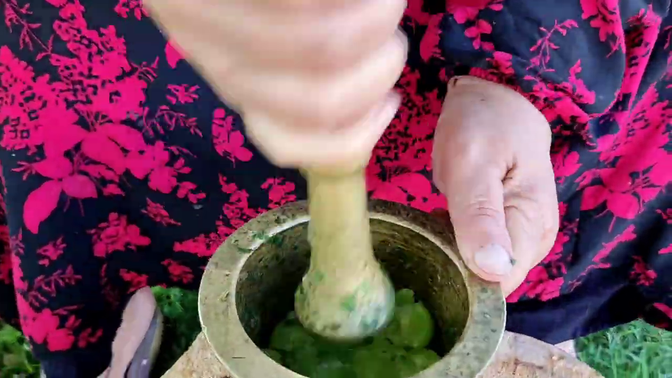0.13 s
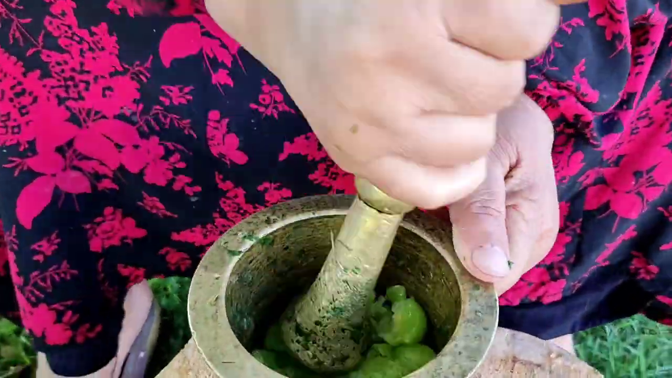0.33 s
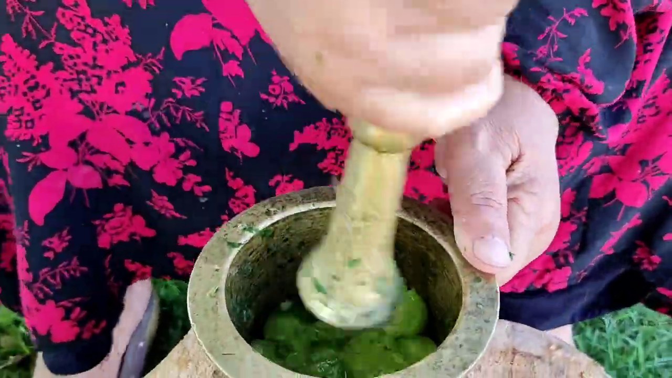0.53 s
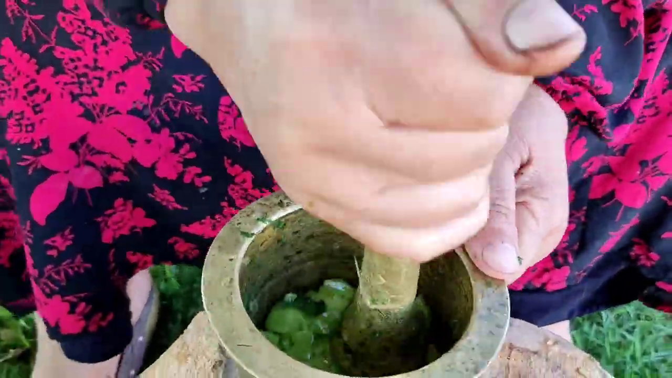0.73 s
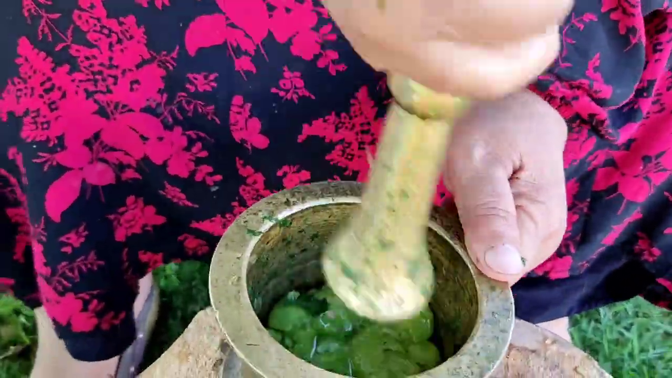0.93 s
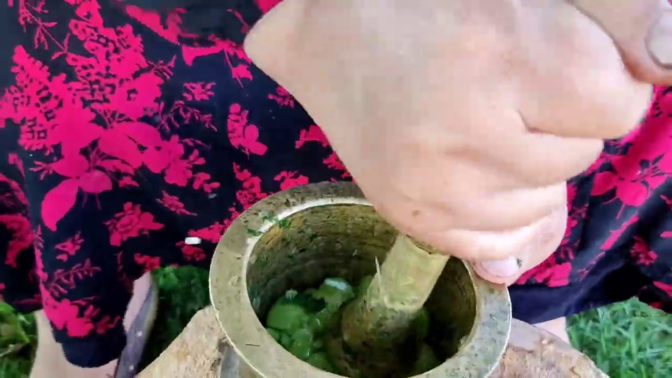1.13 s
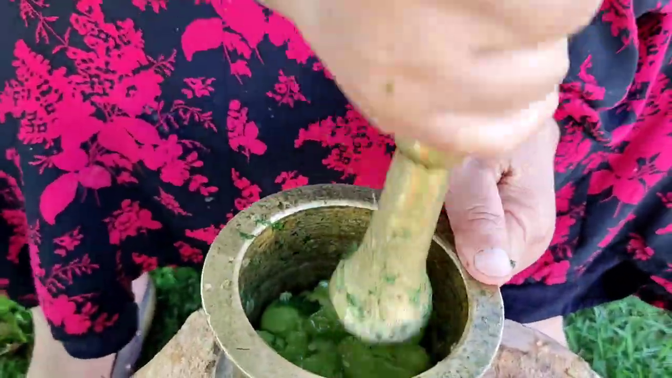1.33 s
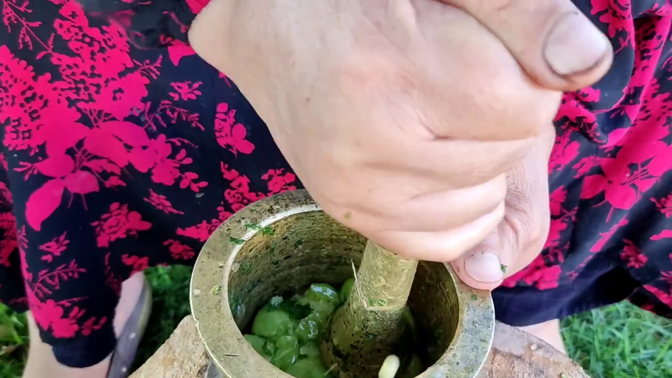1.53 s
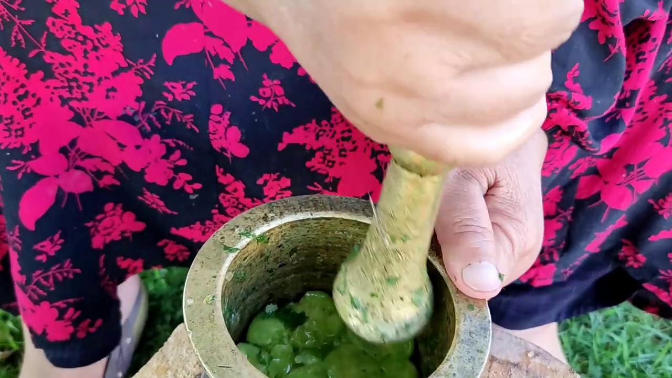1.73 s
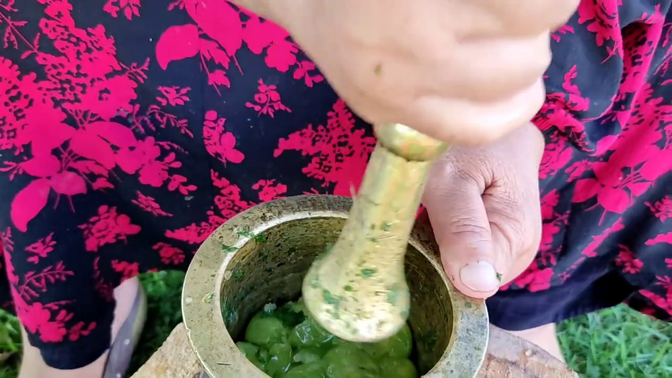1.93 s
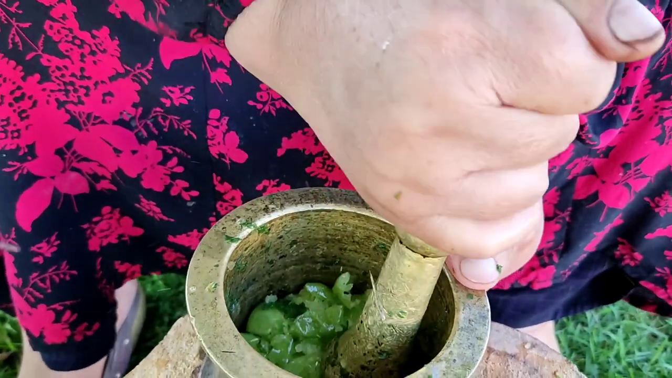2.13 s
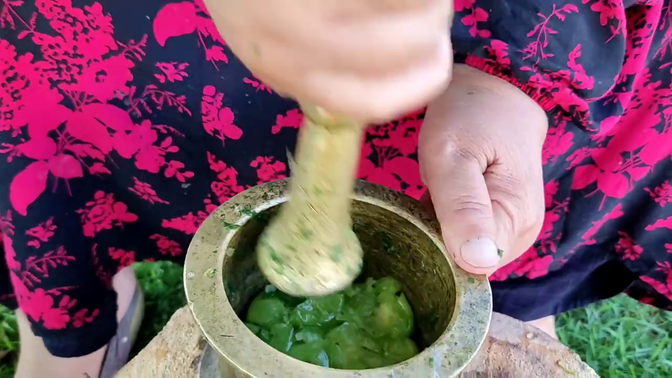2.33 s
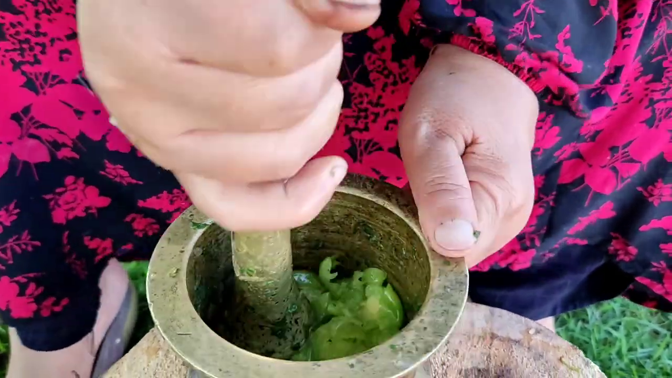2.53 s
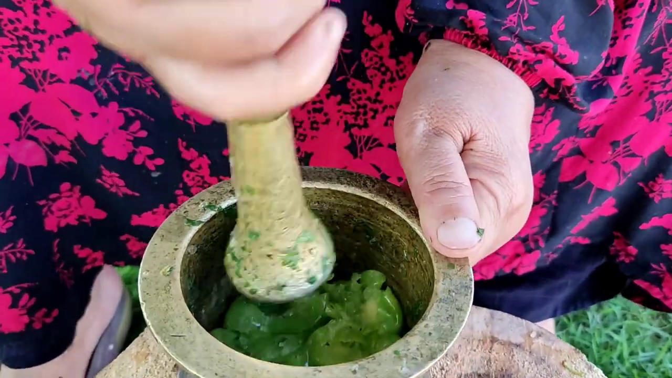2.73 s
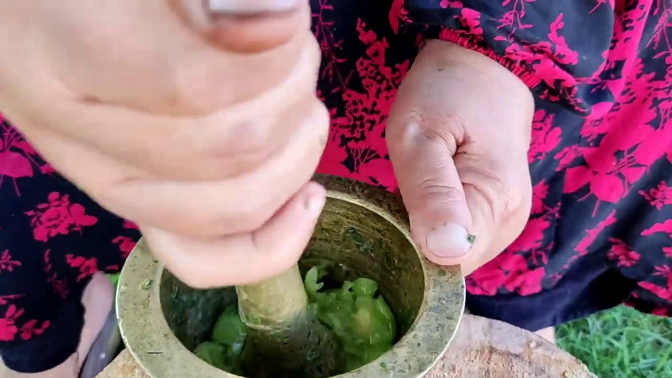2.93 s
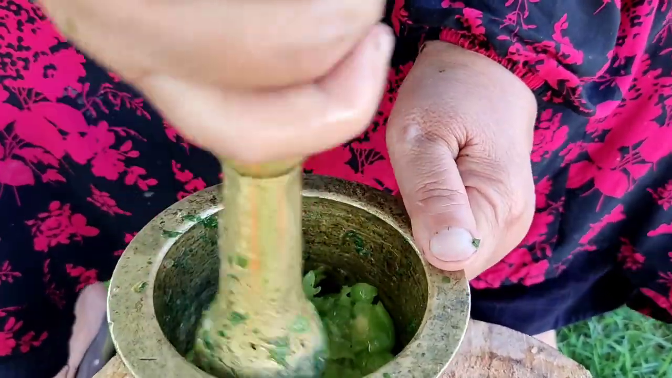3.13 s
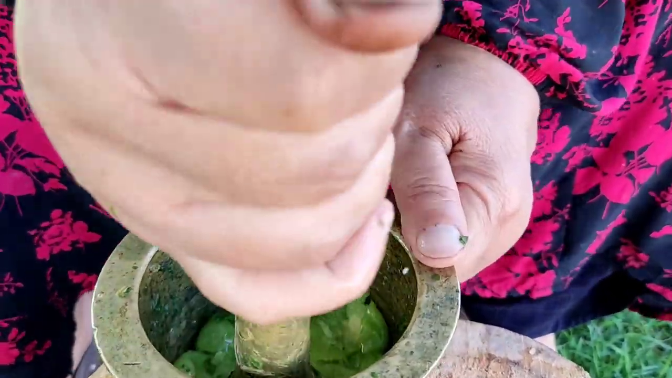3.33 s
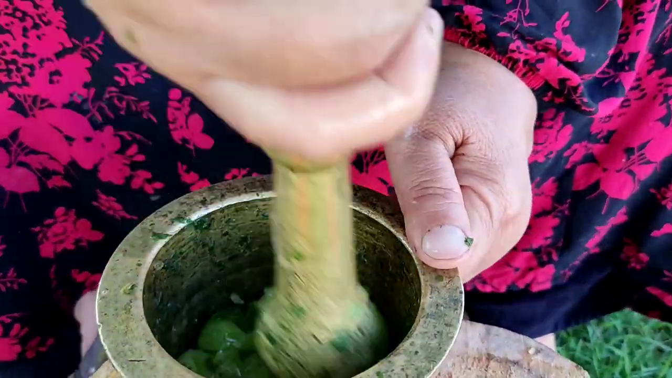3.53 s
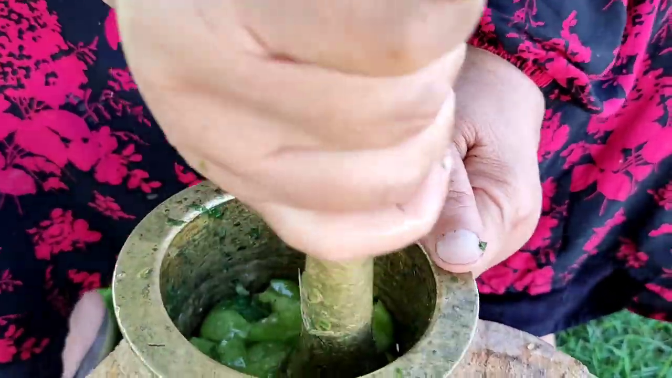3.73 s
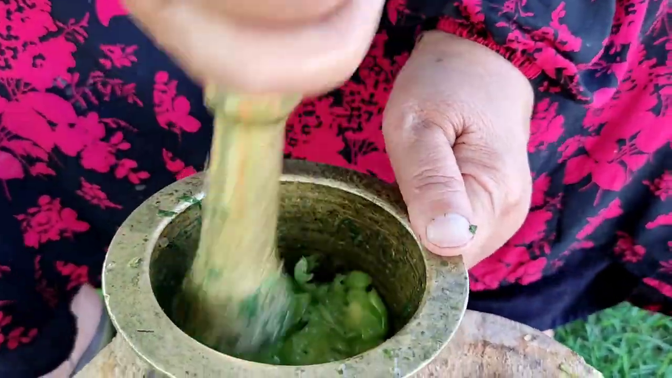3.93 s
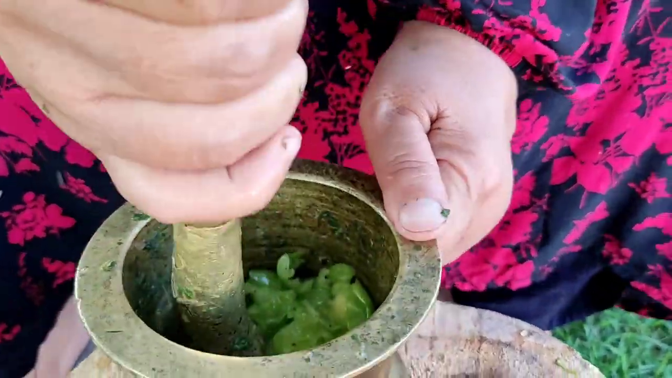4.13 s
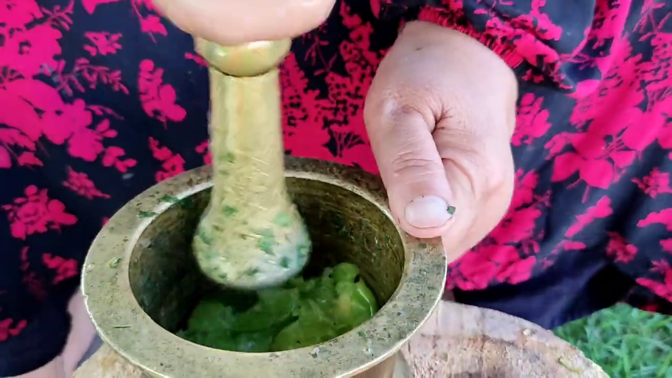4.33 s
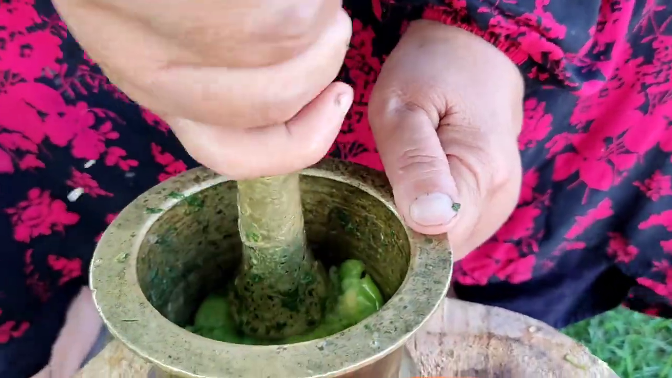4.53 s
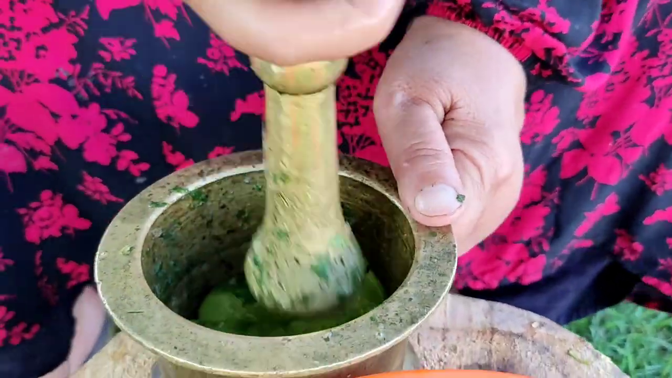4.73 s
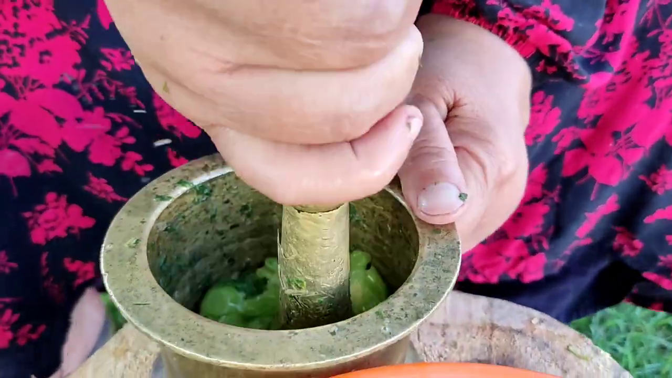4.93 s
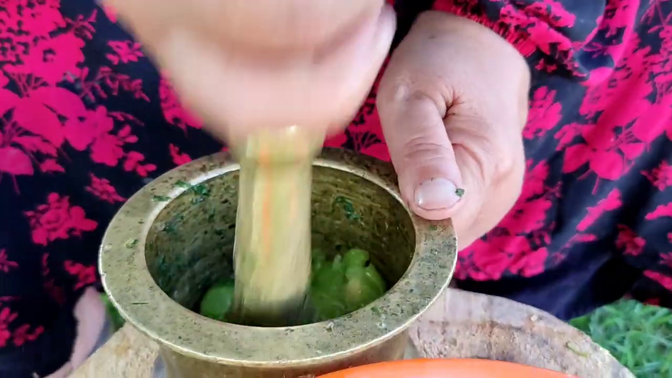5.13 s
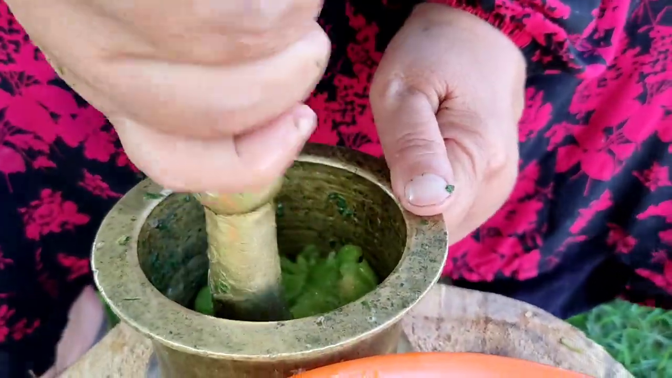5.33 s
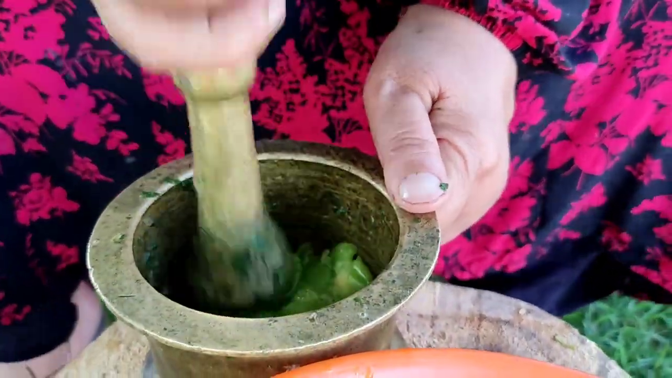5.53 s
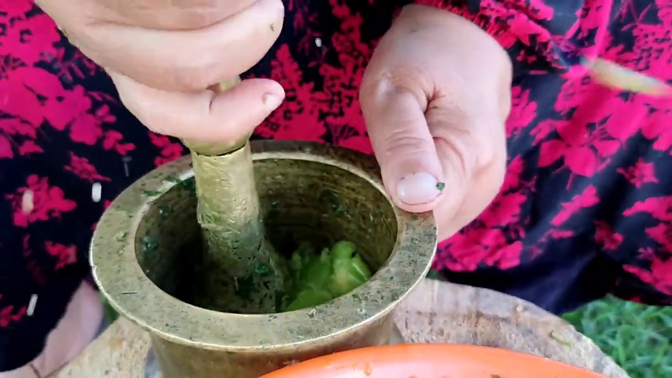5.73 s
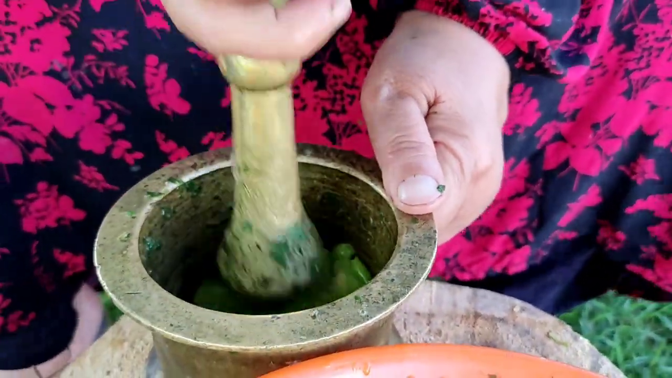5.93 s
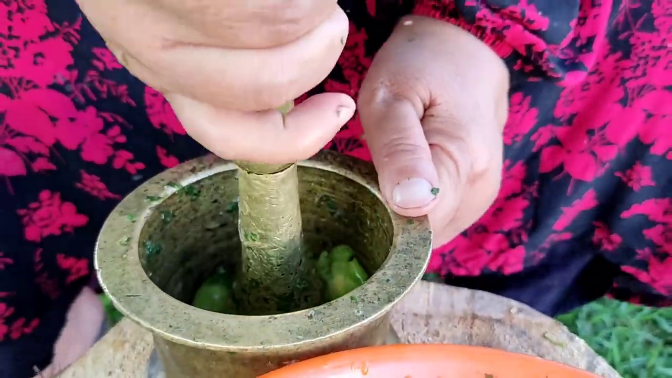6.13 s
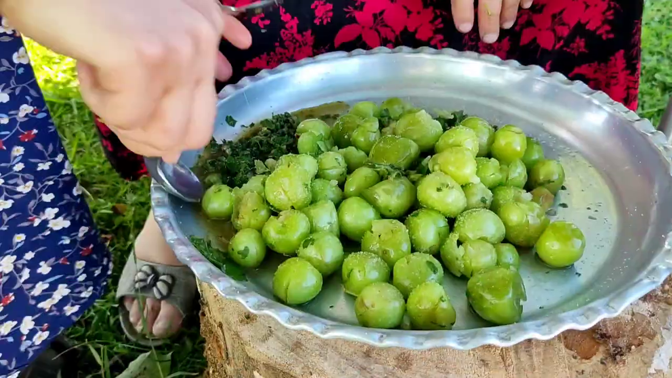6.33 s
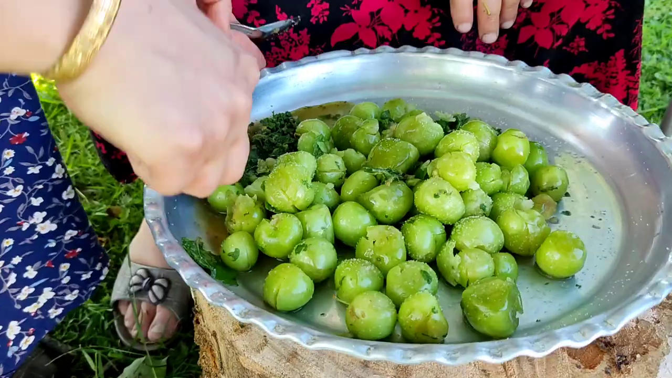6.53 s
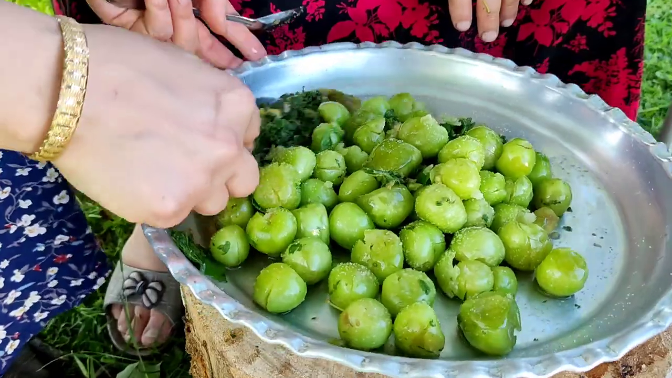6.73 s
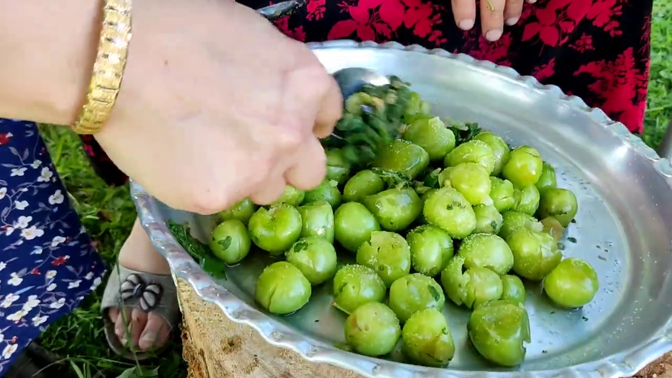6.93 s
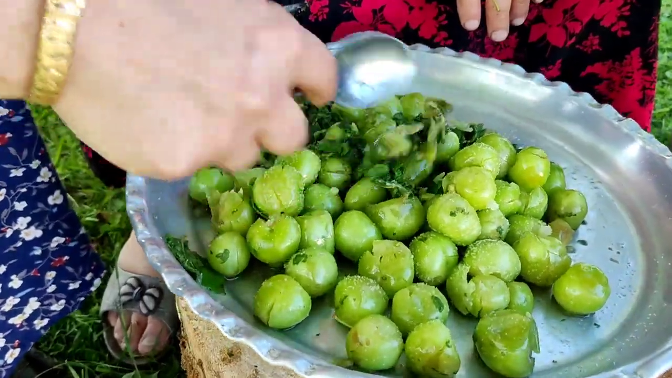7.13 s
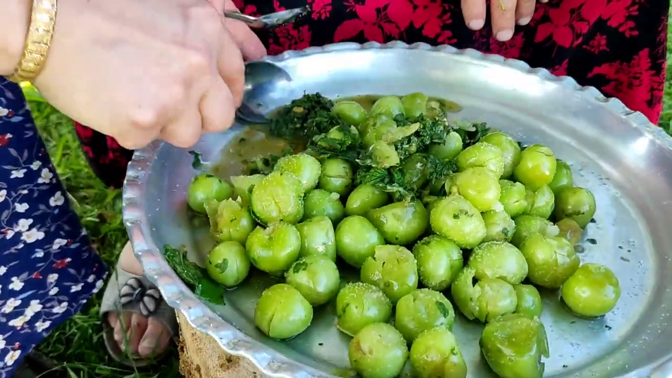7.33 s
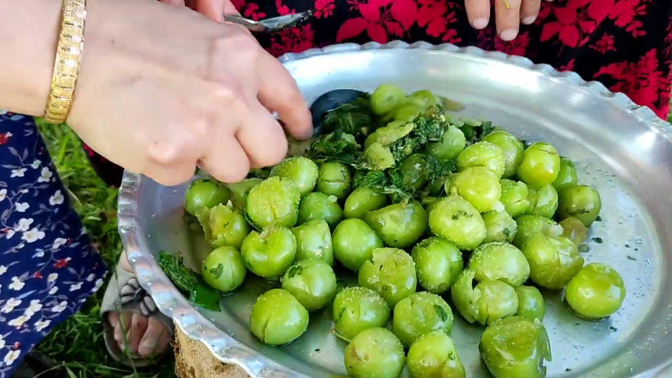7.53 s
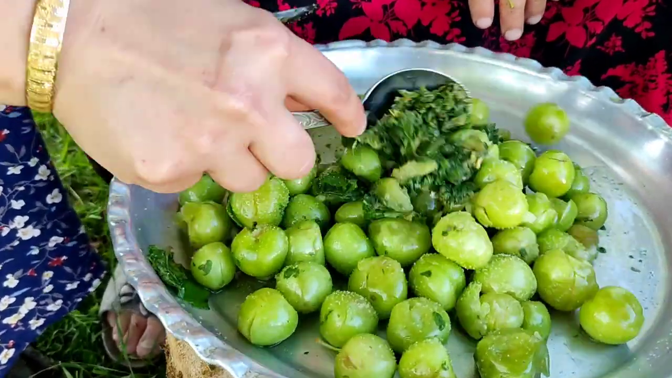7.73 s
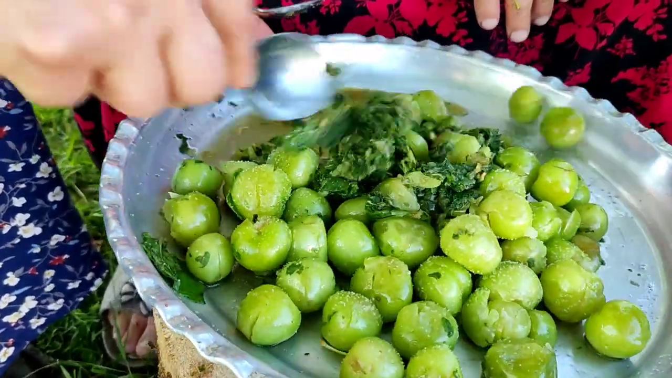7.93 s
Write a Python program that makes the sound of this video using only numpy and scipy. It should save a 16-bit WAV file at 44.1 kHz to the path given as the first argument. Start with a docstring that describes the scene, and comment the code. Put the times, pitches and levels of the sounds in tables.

```python
"""Outdoors in a garden, a brass pestle pounds herbs and green fruit in a brass mortar on a tree stump.
Filtered click grains squirt, fizz and tick as wet pulp; gliding sines gulp, and a low sine thumps the stump.
Some strokes clip the wall first: a tick and decaying sine modes ring briefly; damped sines knock like wood.
Then a spoon, grains ringing a bank of tray modes, knocks and scrapes among the fruit.
Behind lie a far bird and one thin far call (gliding tones), and light wind (shaped noise)."""
import sys
import numpy as np
from scipy import signal
from scipy.io import wavfile
from scipy.ndimage import uniform_filter1d

SR = 44100
rng = np.random.default_rng(int(sys.argv[2]) if len(sys.argv) > 2 else 0)


def master_out(mix):
    """Clip the mix to full scale and print it as 16-bit PCM to the path in sys.argv[1]."""
    frames = np.transpose(np.atleast_2d(mix))
    ceiling = np.clip(frames, -1, 1)
    pcm = np.round(ceiling * 32767).astype(np.int16)
    wavfile.write(sys.argv[1], SR, pcm)


N = 356769
RIGHT_LEAD = 13  # samples by which the right port hears the close sounds first


def gain_of(db):
    """Decibels to gain."""
    return 10 ** (np.asarray(db) / 20)


def evened(x):
    """Scales to rms 1."""
    return x / np.sqrt(np.mean(x ** 2) + 1e-20)


def packet(x):
    """Scales a short sound to the energy of 10 ms at rms 1."""
    return x / np.sqrt(np.mean(x ** 2) * x.shape[-1] / (SR / 100) + 1e-20)


def read(points, hz):
    """Reads a curve of (f/Hz, value) points on a log-frequency axis."""
    f, value = np.transpose(points)
    return np.interp(np.log(hz + 1), np.log(f + 1), value)


def add(mix, s, sound):
    """Mixes a sound in at time s, or at the very start if s is negative."""
    part = mix[:, max(round(s * SR), 0):][:, :sound.shape[-1]]
    part += sound[..., :part.shape[-1]]


def colour(x, db_at):
    """Minimum-phase filter with the gain db_at(Hz), so nothing smears ahead of an attack."""
    hz = abs(np.fft.fftfreq(2048, 1 / SR))
    log_gain = np.log(gain_of(np.maximum(db_at(hz), -100)))
    taps = np.fft.ifft(np.exp(np.conj(signal.hilbert(log_gain)))).real
    return signal.fftconvolve(x, np.atleast_2d(taps), axes=1)[:, :x.shape[1]]


def thirds(x, spectrum):
    """Colours x and splits it into treble, middle and low parts."""
    x = colour(x, lambda hz: read(spectrum, hz))
    parts = []
    for band in [(7000, 16000), (2000, 7000), (200, 2000)]:
        sos = signal.butter(3, band, "bandpass", fs=SR, output="sos")
        parts.append(signal.sosfilt(sos, x))
    return parts


def grains(n, spread_db, apart, clump=8):
    """Tiny clicks of uneven size, shared by both ports plus a share (apart) of each port's own."""
    size = gain_of(spread_db * np.minimum(rng.exponential(1, n // clump + 1), 4))
    size = size.repeat(clump)[:n]
    shared, own = rng.standard_normal(n), rng.standard_normal((2, n))
    left, right = size * (shared + apart * own)
    return np.array([np.roll(left, RIGHT_LEAD), right])


def sides(db):
    """Left and right gains of constant total power, db apart."""
    pair = np.array([gain_of(db / 2), gain_of(-db / 2)]).reshape(2, -1)
    return pair / np.sqrt(np.mean(pair ** 2, axis=0))


# pestle crushing pulp, levels before trim: [t/s, length scale/s, spray level/dB, squelch level/dB,
# slap level/dB, stump thump level/dB, left-right/dB]
PESTLE_CRUSHES = [(0.012, 0.0037, -59, -62, -49.5, -70, -2), (0.148, 0.0016, -41, -51.5, -65, -68, -3),
                  (0.3626, 0.0037, -12.5, -22.5, -31.5, -41, 5), (0.511, 0.016, -40.5, -43, -50, -49, -1),
                  (0.643, 0.00081, -36.5, -73, -71, -70, 3), (.6908, 0.0049, -18, -27.5, -41, -59, -5),
                  (0.696, 0.0069, -12.5, -21, -33, -28, -2), (0.715, 0.017, -25.5, -28, -47, -52, 4),
                  (1.0927, 0.004, -14, -23.5, -41.5, -36, 0.5),
                  (1.4786, 0.0052, -14.5, -31, -40.5, -36.5, 2.5),
                  (2.129, 0.0038, -12.5, -27, -34.5, -27.5, 5.5), (2.34, 0.0079, -48, -47.5, -48.5, -70, 2),
                  (2.529, 0.013, -12, -20, -20.5, -45, 5.5), (2.669, 0.016, -37, -50, -54.5, -70, 1),
                  (2.9376, 0.0066, -13, -26.5, -35, -30.5, 4.5), (3.307, 0.0096, -13.5, -25, -37.5, -33, 5),
                  (3.682, 0.0088, -13.5, -21, -44, -32.5, 4), (4.0718, 0.0097, -11.5, -17.5, -23, -56, 5),
                  (4.482, 0.01, -15, -24, -40, -38, 10), (4.661, 0.0062, -41, -65, -63, -70, -11),
                  (4.8942, 0.008, -14, -24, -39, -28, -1.5), (5.2492, 0.0045, -11, -35, -36.5, -35, 23),
                  (5.649, 0.008, -14, -17, -28, -34, 3), (6.0714, 0.0058, -18, -28.5, -35.5, -32, -1)]
# relative colour of the wet pulp heard from the bowl: [f/Hz, level/dB per Hz]
PULP_COLOUR = [(150, -38), (400, -28.5), (850, -12), (1060, -17.5), (1350, -8.5), (1700, -20.5),
               (2250, -9.5), (2900, -24.5), (3700, -10.5), (4500, -15.5), (5300, -10), (6900, -17),
               (9100, 1.5), (11000, -9), (14300, -20.5)]


def crushes(rise=0.5, fall=0.7, lead=0.97, spread_db=0.0, trims_db=(0, -.5, -1), bowl_shift=0.08,
            seep_db=-13, spatter_db=-32, spatter_decay_s=0.042):
    """Juice and air spray out ever faster as the gap closes, then die off as the pestle lands."""
    out, t = np.zeros((2, N)), np.arange(-SR // 40, SR // 16) / SR
    for s, length, *levels, _, pan_db in PESTLE_CRUSHES:
        squeeze = np.exp(-abs(t) / (length * np.where(t < 0, rise, fall)))
        # little escapes before the pulp is touched
        squeeze *= np.where(t > -lead * length, 1, gain_of(seep_db))
        # droplets land on the wall
        squeeze += (t > 0) * gain_of(spatter_db) * np.exp(-t / spatter_decay_s)
        # the bowl's air resonances depend on where the pestle stands, drawn at random
        shift = 1 + bowl_shift * (2 * rng.random() - 1)
        bowl = [(hz * shift if hz < 5000 else hz, db) for hz, db in PULP_COLOUR]
        parts = thirds(grains(len(t), spread_db, apart=1.0) * squeeze, bowl)
        crush = sum(gain_of(db + trim) * packet(p) for db, trim, p in zip(levels, trims_db, parts))
        add(out, s + t[0], sides(pan_db) * crush)
    return out


# pestle clipping the wall, levels before trim: [t/s, first mode level/dB, second mode level/dB,
# middle modes level/dB, top modes level/dB, contact tick level/dB, ring time factor,
# delay of the first mode at the left port/samples]
WALL_CLANKS = [(2.48, -24.5, -21.5, -25, -19.5, -29, 0.97, 8),
               (2.504, -28.5, -43, -27.5, -32, -35.5, 0.8, 5.8),
               (3.2318, -19, -22, -21, -15.5, -24, 0.86, 10), (3.2757, -66, -52, -38, -38, -38, 1.2, 5),
               (3.6623, -22.5, -24.5, -15, -17, -28.5, 0.86, 6.6),
               (4.052, -21, -28.5, -25, -19.5, -31.5, 0.77, 10.9),
               (4.466, -17, -31, -17.5, -15.5, -29.5, 0.58, 11.3),
               (5.1686, -15.5, -30.5, -14.5, -18.5, -23, 0.88, 10.1),
               (5.1958, -23.5, -26, -21, -26, -37, 0.67, 9), (5.231, -39.5, -51, -44, -49, -36, 0.86, 11),
               (5.248, -27.5, -45, -39.5, -22.5, -32, 1.02, 11.5),
               (5.5129, -16.5, -31, -20.5, -27, -33, 0.85, 11), (5.854, -48.5, -56, -49, -51, -47, 2, 10.8),
               (5.91, -52.5, -71, -51, -50, -54, 0.53, 13.5)]
# ringing modes of the mortar: [f/Hz, relative level/dB, t60/s before damping, left-right/dB]
MORTAR_MODES = [(1535, 3, 0.22, 5.5), (1532, -15, 0.21, 5), (3671, -2, 0.15, -3.5), (3690, -9.5, 0.13, -15),
                (4050, -11.5, 0.064, 4), (4900, -21, 0.11, 3.5), (5450, -3.5, 0.08, 8.5),
                (6200, -7, 0.19, 18.5), (6370, 1.5, 0.054, -5), (7403, 8, 0.068, -3),
                (8300, -24, 0.045, -15.5), (8600, 2.5, 0.044, -11), (9060, 4, 0.077, -46.5),
                (9850, 7, 0.044, -33.5), (11300, -8.5, 0.049, -13), (11200, -3.5, 0.08, 4.5)]
# relative colour of the brass-on-brass tick: [f/Hz, level/dB per Hz]
TICK_COLOUR = [(150, -7.5), (500, -2), (1200, 2), (2400, 1), (3000, -6.5), (5000, -2), (7000, -3.5),
               (9300, 1.5), (11500, -10.5), (14000, -17.5)]


def clanks(ring_db=2, tick_db=7, contact_s=0.00079, tick_decay_s=0.0031, pressed=0.82, tighten=1.114,
           free_db=-28, free_t60_s=0.18, place_db=4.0):
    """Brass meets brass: a tick, then modes that the pestle damps ever harder, over a faint longer ring."""
    out, t = np.zeros((2, N)), np.arange(SR // 4) / SR
    family = np.digitize([mode[0] for mode in MORTAR_MODES], [2500, 4000, 8000])
    attack = 1 - np.exp(-t / contact_s)
    for s, *levels, contact_db, hold, lag in WALL_CLANKS:
        modes = []
        for (hz, db, t60, pan_db), group in zip(MORTAR_MODES, family):
            # the lobes of the first mode turn with the struck spot
            left_lag = RIGHT_LEAD if group else lag
            at_port = t - np.array([[left_lag], [0]]) / SR
            damped = gain_of(-60 * (t / (t60 * hold * pressed)) ** tighten)
            decay = damped + gain_of(free_db - 60 * t / free_t60_s)
            # each spot on the wall favours other modes
            weight = gain_of(db + place_db * rng.standard_normal())
            modes.append(weight * decay * sides(pan_db) * np.sin(2 * np.pi * hz * at_port))
        for k, db in enumerate(levels):
            tone = np.array(modes)[family == k].sum(0)
            start_rms = np.sqrt(np.mean(tone[:, :SR // 200] ** 2))  # over the first 5 ms
            add(out, s, gain_of(db + ring_db) * tone / start_rms * attack)
        clicks = grains(len(t), spread_db=4.5, apart=0.96) * attack * np.exp(-t / tick_decay_s)
        tick = colour(clicks, lambda hz: read(TICK_COLOUR, hz))
        add(out, s, gain_of(contact_db + tick_db) * packet(tick))
    return out


def thumps(hz=44, decay_s=0.018, push_db=2, push_width_s=0.0023, early_s=0.0014):
    """Each crush gives a short push, then the stump sways on the soil for a cycle or two."""
    out, t = np.zeros((2, N)), np.arange(SR // 5) / SR
    sway = np.sin(2 * np.pi * hz * t) * np.exp(-t / decay_s)
    u = t / push_width_s
    push = gain_of(push_db) * u * (1 - u / 2) * np.exp(-u)
    for s, *_, thump_db, _ in PESTLE_CRUSHES:
        add(out, s - early_s, gain_of(thump_db) * (sway + push))
    return out


# air trapped under the pestle: [t/s of the peak, peak level/dB, start f/Hz, end f/Hz]
AIR_GULPS = [(.364, -29, 2280, 2220), (2.132, -39, 2570, 2210), (4.899, -23, 2930, 2020),
             (6.073, -29.5, 2220, 2130)]


def gulps(swell_s=0.0029, glide_s=0.00434):
    """A pocket of air rings for a few milliseconds, sinking in pitch as it opens."""
    out, t = np.zeros((2, N)), np.arange(SR // 20) / SR
    for s, db, start_hz, end_hz in AIR_GULPS:
        pitch = end_hz + (start_hz - end_hz) * np.exp(-t / glide_s)
        turns = np.cumsum(pitch) / SR
        envelope = t / swell_s * np.exp(1 - t / swell_s)
        add(out, s - swell_s, gain_of(db) * envelope * np.sin(2 * np.pi * turns))
    return out


# pulp stirred as the pestle twists and lifts, later as the spoon parts it:
# [t/s of the peak, length scale/s, level/dB before trim]
PULP_STIRS = [(.03, 0.11, -51), (.45, 0.087, -47.5), (.86, 0.049, -48), (1.2, 0.026, -50),
              (1.28, 0.062, -50), (1.66, 0.032, -46), (2.28, 0.059, -45.5), (2.72, 0.26, -52.5),
              (3.1, 0.1, -48.5), (3.57, 0.095, -43.5), (3.85, 0.19, -46.5), (4.22, 0.047, -45),
              (4.7, 0.13, -53.5), (5.04, 0.027, -45), (5.44, 0.025, -50), (5.58, 0.059, -45.5),
              (5.87, 0.058, -48.5), (6.3, 0.087, -62), (6.52, 0.12, -48), (7.68, 0.22, -55.5),
              (7.97, 0.093, -62)]
# relative colour of the fizzing pulp: [f/Hz, level/dB per Hz]
FIZZ_COLOUR = [(200, -12.5), (700, -11), (1400, -11), (2500, -10), (3700, -9), (6400, -8), (9300, 4),
               (11500, -4), (14300, -15)]


def wet_ticks(per_s=60, ticks_db=-4, fizz_db=-2, spread_db=4, rise=1.0, fall=1.7, clump_db=2.0):
    """Each stir swells and dies: a fine fizz in uneven clumps, with single bubbles and fibres letting go."""
    t = np.arange(N) / SR
    power = np.zeros(N)
    for s, length, db in PULP_STIRS:
        swell = gain_of(db) * np.exp(-abs(t - s) / (length * np.where(t < s, rise, fall)))
        power += swell ** 2
    size = gain_of(spread_db * np.minimum(rng.exponential(1, N), 3)) * (rng.random(N) < per_s / SR)
    bursts = signal.lfilter([1], [1, -np.exp(-1 / (0.0018 * SR))], size)  # each dies over 1.8 ms
    ticks = colour(bursts * grains(N, spread_db=4, apart=0.88), lambda hz: read(PULP_COLOUR, hz))
    clumps = gain_of(clump_db * evened(uniform_filter1d(rng.standard_normal(N), size=1100)))
    fizz = colour(clumps * grains(N, spread_db=2.0, apart=3.2), lambda hz: read(FIZZ_COLOUR, hz))
    return np.sqrt(power) * (gain_of(ticks_db) * evened(ticks) + gain_of(fizz_db) * evened(fizz))


# hollow knocks of the mortar rocking on the stump, later of fruit rolling on the tray:
# [t/s, level/dB before trim, main f/Hz]
HOLLOW_KNOCKS = [(0.108, -33, 281), (0.323, -41, 210), (.391, -41, 283), (.717, -35.5, 197),
                 (.744, -41.5, 403), (2.503, -35, 610), (2.529, -50, 330), (2.5434, -23.5, 295),
                 (2.56, -31.5, 330), (2.97, -34.5, 265), (3.045, -38.5, 313), (3.273, -38, 437),
                 (4.067, -32, 332), (4.0801, -20.5, 348), (4.0805, -21, 705), (4.111, -34.5, 249),
                 (5.194, -29, 578), (7.819, -38.5, 285), (7.88, -43, 280), (7.988, -41.5, 260),
                 (8.043, -44, 297)]


def knocks(level_db=-1, t60_s=0.034, pan_db=4):
    """A few heavily damped wooden modes."""
    out, t = np.zeros((2, N)), np.arange(SR // 6) / SR
    modes = [(.62, -15), (1, 2.5), (1.35, -3), (2.2, -12.5), (3.3, -29)]  # (ratio to main f, dB)
    for s, db, hz in HOLLOW_KNOCKS:
        wood = sum(gain_of(mode_db - 60 * t / t60_s) * np.sin(2 * np.pi * hz * ratio * t)
                   for ratio, mode_db in modes)
        add(out, s, gain_of(db + level_db) * sides(pan_db) * wood)
    return out


def ring(hz, t60, t):
    """One dying mode, reaching each port in its own phase."""
    return gain_of(-60 * t / t60) * np.sin(2 * np.pi * (hz * t + rng.random((2, 1))))


# modes of spoon and tray: [nominal f/Hz, relative level/dB, t60/s]
TRAY_MODES = [(880, -2, .05), (1073, -3.5, 0.077), (1454, 13.5, 0.017), (1906, 6.5, 0.049),
              (2500, 1.5, 0.056), (3340, 4, 0.091), (4210, 4, 0.056), (5300, -15, 0.041),
              (6090, 5.5, 0.047), (6750, 2, 0.12), (7820, 11, 0.024), (9000, 7.5, 0.036),
              (10000, -2, 0.038), (9900, -16, .05), (10860, -16, 0.047), (11220, 8.5, 0.093)]


def tray(x, ring_db, load=0.026):
    """Contact clicks pass straight out and also ring the tray, whose modes shift with the spoon's place."""
    t = np.arange(SR // 6) / SR
    body = sum(gain_of(db) * ring(hz * (1 + load * rng.uniform(-1.22, 1)), t60, t)
               for hz, db, t60 in TRAY_MODES)
    ringing = signal.fftconvolve(x, body / np.linalg.norm(body[0]), axes=1)[:, :x.shape[1]]
    return x + gain_of(ring_db) * ringing


def rebound(x, decay_s, count):
    """Slips bounce across the plate for a few milliseconds, in a pattern that changes as the spoon moves."""
    t, place = np.arange(SR // 100) / SR, np.linspace(0, count - 1, x.shape[1])
    out = np.zeros_like(x)
    for k in range(count):
        bounces = evened(rng.standard_normal((1, len(t))) * np.exp(-t / decay_s))
        nearby = x * np.sqrt(np.maximum(1 - abs(place - k), 0))  # crossfade from pattern to pattern
        out += signal.fftconvolve(nearby, bounces, axes=1)[:, :x.shape[1]]
    return out


# spoon landing on the tray: [t/s, length scale/s, treble level/dB, middle level/dB, low level/dB,
# left-right/dB]
TRAY_TAPS = [(6.404, 0.0063, -9, -16.5, -42.5, 1.8), (6.4132, 0.0052, -16, -21, -44, 8.5),
             (6.7283, 0.0052, -35.5, -41.5, -51, -4), (7.3871, 0.005, -14.5, -24, -32, -2),
             (7.406, 0.0048, -23, -32, -34, 7), (7.475, .004, -30, -30, -33.5, 7),
             (7.5437, 0.0046, -36, -41, -53, -2), (7.561, 0.0051, -38, -34.5, -39.5, -3),
             (7.801, 0.015, -39.5, -41.5, -50, -4), (7.856, 0.0037, -35, -45.5, -57, 2)]
# spoon dragged through the fruit, one list per drag:
# [t/s, treble level/dB, middle level/dB, low level/dB]
FRUIT_SCRAPES = [
    [(6.56, -35, -52, -72), (6.58, -33.5, -36, -39.5), (6.628, -35, -41, -50), (6.676, -43, -49.5, -51),
     (6.734, -46, -43.5, -46.5), (6.76, -71, -73, -71)],
    [(7.405, -38, -33.5, -34), (7.466, -36.5, -41, -37), (7.492, -23.5, -23.5, -35),
     (7.511, -30.5, -27.5, -43), (7.535, -37, -53, -62)],
]
# relative colour of spoon on metal: [f/Hz, level/dB per Hz]
METAL_COLOUR = [(200, -26), (450, -5.5), (950, 0), (2100, -8.5), (3400, -7), (4600, -3), (5400, -3),
                (6500, -11), (9000, 6.5), (11200, -5), (12500, -3.5), (14300, -24)]


def spoon(rise=0.14, fall=0.63, catch_db=2.5):
    """The spoon lands with a short chatter, then slips and catches along the metal."""
    out, t = np.zeros((2, N)), np.arange(-SR // 100, SR // 8) / SR
    for s, length, *levels, pan_db in TRAY_TAPS:
        chatter = np.exp(-abs(t) / (length * np.where(t < 0, rise, fall)))
        clicks = grains(len(t), spread_db=-1.0, apart=0.63) * chatter
        parts = thirds(tray(clicks, ring_db=-5), METAL_COLOUR)
        tap = sum(gain_of(db) * packet(p) for db, p in zip(levels, parts))
        add(out, s + t[0] - length / 4, sides(pan_db) * tap)
    for rows in FRUIT_SCRAPES:
        s, *levels = np.transpose(rows)
        t = np.arange(s[0], s[-1], 1 / SR)
        catches = gain_of(catch_db * evened(uniform_filter1d(rng.standard_normal(len(t)), size=160)))
        slips = rebound(grains(len(t), spread_db=1.5, apart=0.62) * catches, decay_s=0.0019, count=4)
        parts = thirds(tray(slips, ring_db=-9.5), METAL_COLOUR)
        drag = sum(gain_of(np.interp(t, s, db)) * evened(p) for db, p in zip(levels, parts))
        add(out, s[0], drag * signal.windows.tukey(len(t), .08))
    return out


# decay of the scattered tail: [f/Hz, t60/s]
TAIL_DECAY = [(200, .12), (1500, 0.16), (4000, 0.13), (10000, 0.11), (14000, 0.055)]


def surroundings(x, tail_db=-19, echo_db=-17, echo_s=0.006, echo_width_s=0.00098):
    """A near echo from the lap and the stump, and a short scattered tail."""
    t = np.arange(SR // 3) / SR
    hz, at, z = signal.stft(rng.standard_normal((2, len(t))) * (t > echo_s), SR, nperseg=256)
    tail_colour = [(300, -5.0), (1500, 1), (4000, 5), (9000, -8.0), (14000, -8.5)]  # (Hz, dB)
    fade_db = -60 * at / read(TAIL_DECAY, hz)[:, None]
    shaped = z * gain_of(fade_db + read(tail_colour, hz)[:, None])
    tail = signal.istft(shaped, SR, nperseg=256)[1][:, :len(t)]
    near = rng.standard_normal((2, len(t))) * np.exp(-((t - echo_s) / echo_width_s) ** 2)
    response = gain_of(tail_db) * tail / np.linalg.norm(tail[0])
    response += gain_of(echo_db) * near / np.linalg.norm(near[0])
    return signal.fftconvolve(x, response, axes=1)[:, :N]


# far bird, falling slurs: [t/s, length/s, start f/Hz, end f/Hz (both before trill), level/dB before trim]
BIRD_SLURS = [(0.601, 0.12, 5300, 3850, -44.5), (1.581, 0.15, 5060, 4270, -54.5),
              (2.39, 0.1, 5200, 4770, -52), (2.816, 0.22, 5430, 3150, -46),
              (4.158, 0.16, 4260, 3270, -44.5), (5.06, 0.07, 5020, 4500, -54),
              (6.817, .11, 4100, 3320, -58.5), (7.086, .13, 4090, 2720, -46),
              (7.058, 0.15, 5500, 4240, -54.5), (7.26, 0.16, 5300, 4080, -53.5),
              (7.806, 0.16, 4800, 4010, -56)]


def bird(level_db=-2, trill=0.059, trill_hz=27, blur_hz=280):
    """Falling runs of quick upward flicks, blurred by distance and foliage."""
    out = np.zeros((2, N))
    low_pass = signal.butter(2, blur_hz, fs=SR, output="sos")
    for s, length, start_hz, end_hz, db in BIRD_SLURS:
        t = np.arange(int(length * SR)) / SR
        flicks = signal.sawtooth(2 * np.pi * (trill_hz * t + rng.random()))
        pitch = np.geomspace(start_hz, end_hz, len(t)) * (1 + trill * flicks)
        scatter = rng.standard_normal((2, len(t))) + 1j * rng.standard_normal((2, len(t)))
        blur = signal.sosfilt(low_pass, scatter)
        slur = (blur * np.exp(2j * np.pi * np.cumsum(pitch) / SR)).real
        add(out, s, gain_of(db + level_db) * evened(slur) * signal.windows.tukey(len(t), .6))
    return out


# faint far call, a single row: [t/s, length/s, start f/Hz, end f/Hz, starting level/dB]
DISTANT_CALL = (1.635, 0.47, 788, 724.5, -65.5)


def far_call(settle_s=0.047, fade_db=-12):
    """One thin note from far off that sinks to its pitch and fades."""
    out, (s, length, start_hz, end_hz, db) = np.zeros((2, N)), DISTANT_CALL
    t = np.arange(int(length * SR)) / SR
    pitch = end_hz + (start_hz - end_hz) * np.exp(-t / settle_s)
    note = np.sqrt(2) * np.sin(2 * np.pi * np.cumsum(pitch) / SR)
    add(out, s, gain_of(db + fade_db * t / length) * note * signal.windows.tukey(len(t), .2))
    return out


# relative colour of the background within each band: [f/Hz, level/dB per Hz]
AIR_COLOUR = [(20, 3.5), (60, -16), (90, -6), (125, -8), (200, -19.5), (320, -19.5), (500, -26),
              (1000, -28.5), (2500, -27.5), (3700, -26), (6400, -34), (9300, -26.5), (11500, -26),
              (14500, -39)]
# likeness of left and right in the background: [f/Hz, correlation]
LEFT_RIGHT_LIKENESS = [(30, 0), (130, 0.95), (300, 0.79), (630, 0.52), (1400, 0.1), (14000, 0)]
# slow drift of the garden wash: [t/s, level/dB before trim]
WASH_LEVEL = [(0.0, -67.5), (0.99, -62.5), (1.37, -68), (3.0, -61.5), (7.26, -66.5), (7.61, -61.5),
              (8.09, -65)]
RUMBLE_DB, HISS_DB = -51.5, -59.5  # steady wind below the wash, faint hiss above it


def air(patchy_db=2.33, flicker_db=1, wash_db=4.0):
    """Wind rumble, garden wash and fine hiss as shaped noise; only the wash drifts slowly in level."""
    frames, hz = N // 256 + 5, np.fft.rfftfreq(1024, 1 / SR)
    a, b, c, d, patches = rng.standard_normal((5, frames, len(hz)))
    # patches vary over time and frequency; the flicker moves all frequencies together
    patches = uniform_filter1d(patches, size=8, axis=0)
    patches = evened(uniform_filter1d(patches, size=14, axis=1))
    flicker = evened(uniform_filter1d(rng.standard_normal(frames), size=4))[:, None]
    same, left = np.clip(read(LEFT_RIGHT_LIKENESS, hz), -1, 1), a + 1j * b
    right = same * left + np.sqrt(1 - same ** 2) * (c + 1j * d)
    z = np.array([left, right])
    unrest = np.clip(hz / 1000, .3, 1)  # the lows stay calmer
    z *= gain_of(read(AIR_COLOUR, hz) + unrest * (patchy_db * patches + flicker_db * flicker))
    band = np.digitize(hz, [700, 6500])
    wash = np.interp(np.arange(N) / SR, *np.transpose(WASH_LEVEL)) + wash_db
    out = np.zeros((2, N))
    for k, db in enumerate([RUMBLE_DB, wash, HISS_DB]):
        spectra = (z * (band == k)).transpose(0, 2, 1)
        part = signal.istft(spectra, nperseg=1024, noverlap=768)[1][:, :N]
        out += gain_of(db) * evened(part)
    return out


def scene():
    """The work close by, its echoes, and the garden."""
    close = crushes() + gulps() + clanks() + knocks() + spoon() + wet_ticks()
    return close + surroundings(close) + thumps() + bird() + far_call() + air()


# colour difference of the microphone ports: [f/Hz, left-right/dB]
PORT_BALANCE = [(100, 0), (500, 1), (1200, 3), (2400, 1.5), (3500, 2), (5300, 0.5), (7000, 1.5),
                (9200, -12), (10300, 1.5), (11100, 7.5), (13000, 5.5)]
EDGE_HZ = 14350  # upper band limit


def record(dry):
    """Each microphone port has its own colour; peaks are rounded off below full scale, then band-limited."""
    heard = colour(dry, lambda hz: 20 * np.log10(sides(read(PORT_BALANCE, hz))))
    rounded = heard / (1 + heard ** 4) ** .25
    low_pass = signal.firwin(255, EDGE_HZ, window=("kaiser", 8), fs=SR)
    return signal.oaconvolve(rounded, low_pass[None], "same")


dry = scene()
out = record(dry)
master_out(out)
```